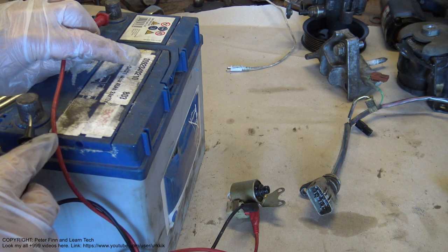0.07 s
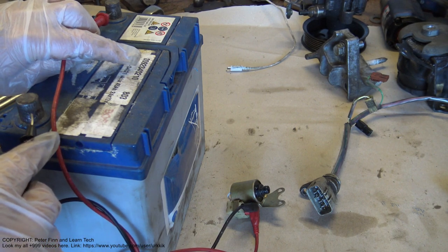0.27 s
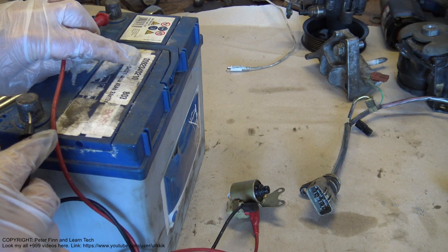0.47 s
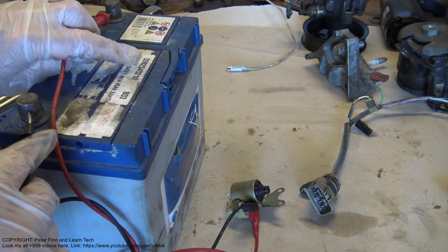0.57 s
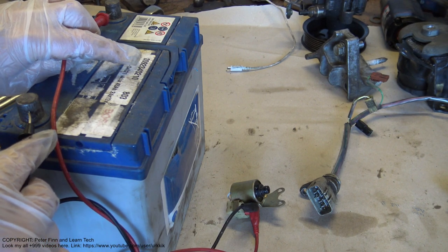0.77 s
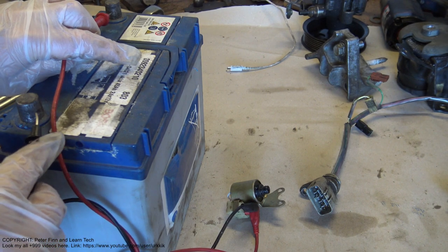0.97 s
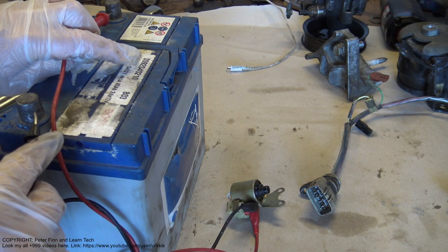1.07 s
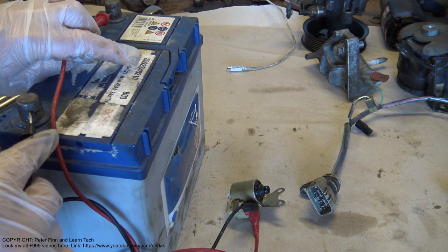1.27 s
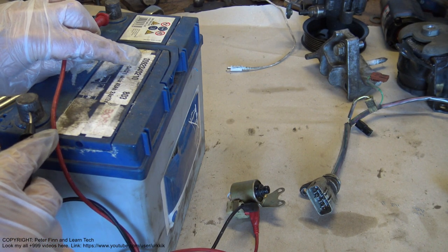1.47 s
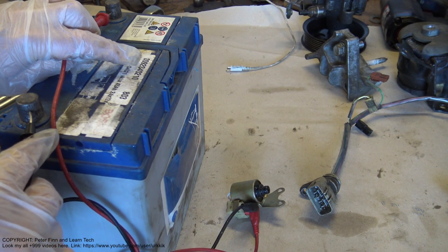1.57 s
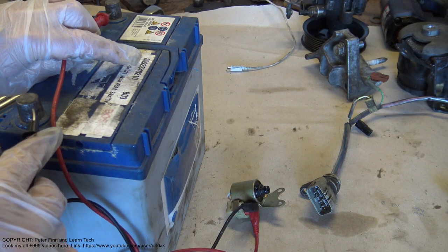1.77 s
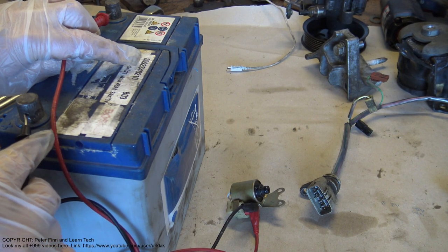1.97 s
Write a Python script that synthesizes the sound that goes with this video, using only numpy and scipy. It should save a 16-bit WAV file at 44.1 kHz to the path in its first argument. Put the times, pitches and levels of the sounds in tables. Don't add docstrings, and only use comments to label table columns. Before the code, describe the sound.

Bright metallic solenoid clicks, alternating pull-in and spring release, over faint low roar and hiss

```python
import sys
import numpy as np
from scipy import signal
from scipy.fft import rfft, irfft, next_fast_len
from scipy.io import wavfile
from scipy.ndimage import uniform_filter1d, map_coordinates

SR = 44100
rng = np.random.default_rng(int(sys.argv[2]) if len(sys.argv) > 2 else 0)


def inscribe(sig):
    pcm = np.round(np.clip(np.atleast_2d(sig).T, -1, 1) * 32767)
    wavfile.write(sys.argv[1], SR, pcm.astype(np.int16))


def to_linear_factor(level_db):
    exponent = np.asarray(level_db, float) / 20
    return 10 ** exponent


N = 89346
TOP_HZ = 15800

# (frequency [Hz], difference [dB])
CLICK_PAN = [(1500, -5.5), (2900, 0.5), (4400, -3), (8000, -5), (11000, -4.5), (15000, -5.5)]
PORTS = np.array([[.5], [-.5]])


def unit(x):
    return x / np.sqrt(np.mean(x ** 2) + 1e-20)


def along(points, hz):
    f, v = np.transpose(points)
    return np.interp(np.log(hz + 1), np.log(f + 1), v)


def filtered(x, response):
    n = x.shape[-1]
    m = next_fast_len(n + SR // 2)
    spectrum = rfft(x, m) * response(np.fft.rfftfreq(m, 1 / SR))
    return irfft(spectrum, m)[..., :n]


def wobble(rate_hz):
    knots = rng.standard_normal(int(N * rate_hz / SR) + 4)
    return map_coordinates(knots, [np.arange(N) * rate_hz / SR])


def rush(response, patchy_db):
    # (frequency [Hz], correlation [1])
    alike = [(40, 0.84), (80, 0), (150, 0.82), (1650, 0.63), (4000, 0), (15000, 0)]
    z = signal.stft(rng.standard_normal((2, N + 512)), nperseg=512)[2]
    patches = uniform_filter1d(rng.standard_normal(z.shape[1:]), size=5, axis=0)
    patches = unit(uniform_filter1d(patches, size=12, axis=1))
    pair = signal.istft(z * to_linear_factor(patchy_db * patches), nperseg=512)[1][:, :N]

    def mid_side(hz):
        angle = np.arccos(np.clip(along(alike, hz), -1, 1)) / 2
        return response(hz) * [np.cos(angle), np.sin(angle)]

    mid, side = filtered(pair, mid_side)
    return unit(np.array([mid + side, mid - side]))


def background():
    # (frequency [Hz], density [dB per Hz])
    roar_curve = [(41, -45.5), (70, -6.5), (296, -6), (417, -9), (976, -1), (1090, -3), (1350, -5.5),
                  (1470, -11.5), (3500, -28), (4550, -39), (7700, -120)]
    # (frequency [Hz], half width [Hz], level [dB])
    drone_lines = [(26, 9, -64), (41, 7, -55.5), (66, 10, -67), (122, 12, -63), (171, 12, -63),
                   (202, 10, -64), (287, 9, -61)]
    # (frequency [Hz], density [dB per Hz])
    hiss_curve = [(1760, -32.5), (3000, -20.5), (4260, 0), (4930, -4.5), (6230, -2.5), (15600, -7)]
    roar_db, swell_db, patch_db = -42.5, 0.4, 0.8
    hiss_db, pan_db = -62.5, -2

    swell = to_linear_factor(roar_db + swell_db * (wobble(1.39) + wobble(9.35)))
    roar = swell * rush(lambda f: to_linear_factor(along(roar_curve, f)), patch_db)
    drone = sum(to_linear_factor(db) * rush(lambda f: 1 / (1 + ((f - hz) / width_hz) ** 4), 0)
                for hz, width_hz, db in drone_lines)
    hiss = to_linear_factor(hiss_db) * rush(lambda f: to_linear_factor(along(hiss_curve, f)) * (f < TOP_HZ), 0)
    return (roar + drone + hiss) * to_linear_factor(pan_db * PORTS)


def ringing(hz, db, t60_s, t):
    scatter_db = 0.67
    hz, db, t60_s = np.array([hz, db, t60_s])[:, :, None]
    level_db = db + scatter_db * rng.standard_normal(hz.shape) - 60 * t / t60_s
    modes = to_linear_factor(level_db) * np.sin(2 * np.pi * hz * t)
    return to_linear_factor(PORTS * along(CLICK_PAN, hz.T)) @ modes


def plunger(blows, snap, body_hz, body, rattle, ring_db, slide_s):
    rattle_db, rattle_t60_s = -16.5, 0.048
    fresh = 0.306
    slide_db, rise_s = -44, 0.0002
    snap_send_db, rattle_send_db, ring_send_db = -0.5, 3, -4

    out = np.zeros((2, 2, N + SR))
    t = np.arange(SR // 4) / SR

    def grit():
        noise = rng.standard_normal(len(t))
        return unit(filtered(noise, lambda f: to_linear_factor(along(rattle, f) + PORTS * along(CLICK_PAN, f))))

    usual = grit()
    for time_s, db in blows:
        ring = to_linear_factor(ring_db) * ringing(body_hz, *np.transpose(body), t) / 2
        buzz = to_linear_factor(rattle_db - 60 * t / rattle_t60_s) * (usual + fresh * grit())
        crack = ringing(*np.transpose(snap), t) / 2
        direct = crack + buzz + ring
        sent = to_linear_factor(snap_send_db) * crack + to_linear_factor(rattle_send_db) * buzz + to_linear_factor(ring_send_db) * ring
        blow = np.array([direct, sent]) * (1 - np.exp(-t / rise_s))
        slide = grit() * (t < slide_s)
        out[..., round(time_s * SR):][..., :len(t)] += to_linear_factor(db) * blow
        out[..., round((time_s - slide_s) * SR):][..., :len(t)] += to_linear_factor(db + slide_db) * slide
    return out[..., :N]


def pull_in():
    # (time [s], peak level [dB])
    pulls = [
        (.5025, -2.5),
        (1.273, -1.5),
        (2.0146, -2),
    ]
    # (frequency [Hz], level [dB], t60 [s])
    snap = [(1900, -20, .004), (2880, -14, .006), (4640, -10, .01), (6500, -3, .004), (7650, 7.5, .004),
            (9000, -1, .004), (11000, -9, .005), (13300, -8, .007), (15200, -7, .007)]
    body_hz = [2870, 4600, 6350, 7000, 7420, 7650, 8040, 8890, 10400, 11630, 12200, 12900, 13330, 15200]
    # (level [dB], t60 [s])
    body = [(-6.5, 0.041), (-22, 0.059), (-16, 0.04), (-11, 0.047), (-13, 0.015), (-10, 0.05), (-35, 0.027),
            (-21, .03), (-20, 0.052), (-13.5, 0.04), (-27, 0.031), (-28.5, .035), (-20, 0.028), (-16, .025)]
    # (frequency [Hz], density [dB per Hz])
    rattle = [(880, -66), (1500, -13.5), (2030, -18), (2850, -6), (3890, -18), (4520, -37), (7770, 0.5),
              (15700, -11.5), (16500, -43.5)]
    return plunger(pulls, snap, body_hz, body, rattle, ring_db=-1, slide_s=0.008)


def release():
    # (time [s], peak level [dB])
    releases = [
        (.905, -2),
        (1.6492, -2.5),
    ]
    # (frequency [Hz], level [dB], t60 [s])
    snap = [(2340, -12, .009), (4500, -19, .006), (7540, 5, .007), (9000, -5, .005), (10500, 3, .008),
            (11800, -8, .006), (13200, -11, .007), (15200, -8, .007)]
    body_hz = [370, 2310, 2750, 4545, 6350, 7300, 7500, 8100, 9330, 9830, 10430, 11600, 13400, 15000]
    # (level [dB], t60 [s])
    body = [(-32, 0.13), (-16.5, 0.043), (-26, 0.0067), (-15.5, 0.083), (-16, 0.042), (-18, .035),
            (-21, 0.018), (-10.5, 0.043), (-7.5, .035), (-32, .035), (-12, 0.031), (-5.5, 0.058),
            (-15, 0.03), (-8.5, .025)]
    # (frequency [Hz], density [dB per Hz])
    rattle = [(880, -69), (1500, -22), (2260, -15), (3120, -16.5), (4610, -4.5), (5750, -16.5), (10700, -5),
              (15500, -21.5), (16500, -28)]
    return plunger(releases, snap, body_hz, body, rattle, ring_db=-2.5, slide_s=0.005)


def contact():
    t = np.arange(N) / SR - 1.2652
    return (t > 0) * ringing(hz=[2900], db=[-30], t60_s=[0.006], t=np.abs(t))


def evened(tail):
    z = rfft(tail)
    power = np.abs(z) ** 2
    gain = np.sqrt(uniform_filter1d(power, size=1200) / uniform_filter1d(power, size=120))
    return irfft(z * gain, tail.shape[-1])


def workshop(direct, sent):
    # (delay [s], level [dB])
    echoes = [(.0038, -25.5), (.0052, -18.5), (.0093, -19), (0.0134, -20)]
    # (frequency [Hz], t60 [s])
    shop_t60 = [(1500, 0.87), (3000, 0.43), (5200, 0.52), (8000, 0.3), (12000, 0.3), (16000, .22)]
    echo_skew_s, left_lag_s = 0.00004, 0.00002
    shop_db, shop_delay_s, tail_alike = -7.5, 0.003, 0.11
    clutter_db, clutter_t60_s = -8, 0.08

    skew_s = echo_skew_s * rng.standard_normal((len(echoes), 2, 1))

    def early(f):
        comb = 1 + sum(to_linear_factor(db) * np.exp(-2j * np.pi * f * (delay_s + skew))
                       for (delay_s, db), skew in zip(echoes, skew_s))
        return comb * np.exp(-2j * np.pi * f * PORTS * left_lag_s)

    near = filtered(direct, early)

    hz, t, z = signal.stft(rng.standard_normal((2, 2, SR // 2)), SR, nperseg=256)
    shop_fade = to_linear_factor(-60 * t / along(shop_t60, hz)[:, None])
    clutter_fade = to_linear_factor(-60 * t / clutter_t60_s) + 0 * hz[:, None]
    fades = np.array([shop_fade, clutter_fade])
    tails = signal.istft(z * fades[:, None], SR, nperseg=256)[1]
    tails = evened(tails + tail_alike * tails[:, ::-1])
    tails = tails / np.linalg.norm(tails, axis=-1, keepdims=True)
    tail = to_linear_factor(shop_db) * tails[0] + to_linear_factor(clutter_db) * tails[1]
    tail = np.pad(tail, ((0, 0), (round(shop_delay_s * SR), 0)))
    far = signal.fftconvolve(sent, tail, axes=1)[:, :N]
    return near + filtered(far, lambda f: f < TOP_HZ)


def notched(x):
    # (centre [Hz], width [Hz], depth [0-1])
    dents = [(3680, 500, 0.13), (5290, 940, 0.5)]

    def notches(f):
        return np.prod([1 - depth * 1j * f * width_hz / (hz * hz - f * f + 1j * f * width_hz)
                        for hz, width_hz, depth in dents], axis=0)

    return filtered(x, notches)


def scene():
    air = background()
    direct, sent = pull_in() + release() + contact()
    return notched(workshop(direct, sent)) + air


def top_cut(x):
    return signal.sosfilt(signal.butter(12, 16820, fs=SR, output="sos"), x)


def record(dry):
    over_top_db = -12
    limited = filtered(dry, lambda hz: np.where(hz < TOP_HZ, 1, to_linear_factor(over_top_db)))
    return top_cut(np.clip(limited, -1, 1))


dry = scene()
out = record(dry)
inscribe(out)
```